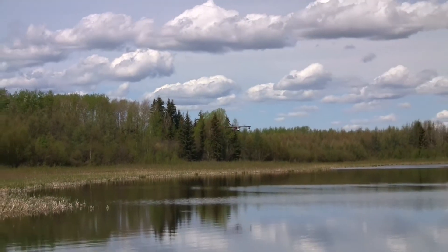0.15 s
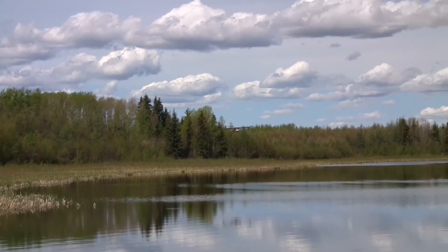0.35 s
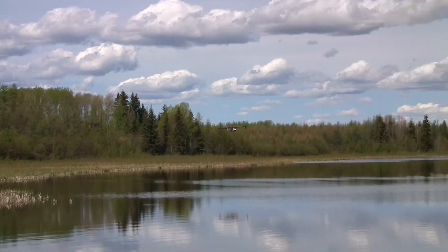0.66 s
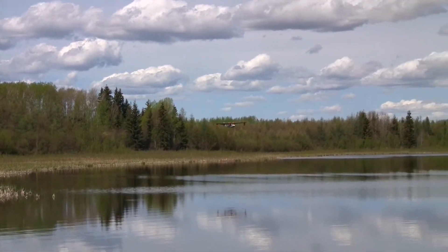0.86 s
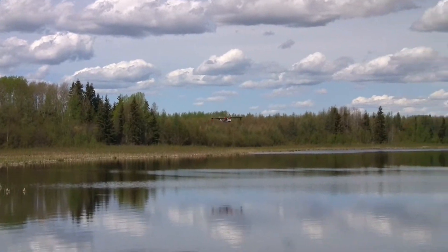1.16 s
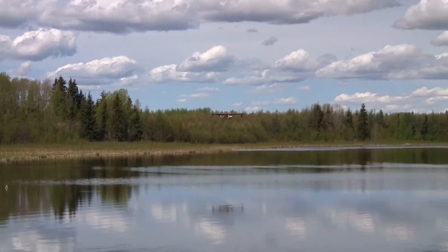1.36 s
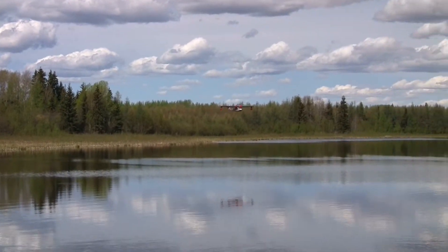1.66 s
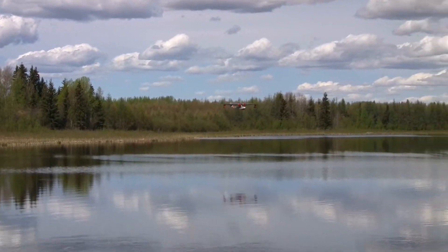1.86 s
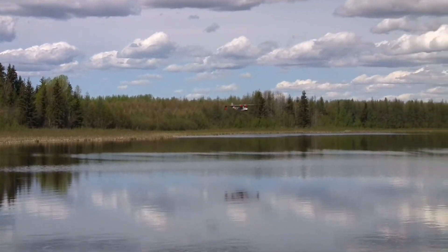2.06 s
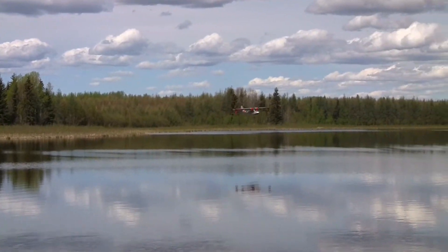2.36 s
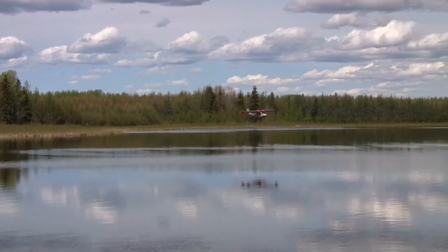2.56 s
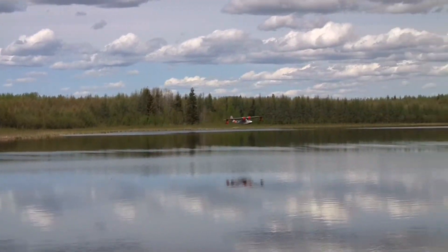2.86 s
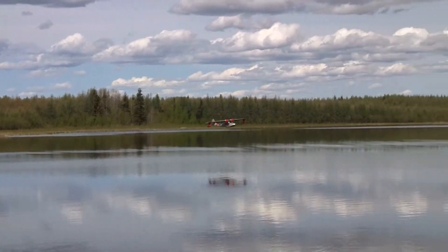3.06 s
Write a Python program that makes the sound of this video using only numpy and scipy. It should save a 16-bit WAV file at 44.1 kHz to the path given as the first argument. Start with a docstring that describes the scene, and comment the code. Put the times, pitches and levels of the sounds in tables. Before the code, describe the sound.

Raspy twin-engine buzz of a model plane starts distant and dull, then swells unevenly and sharpens as it nears over water; faint low air and light microphone hiss sit beneath, outdoors on open shore.

```python
"""From the start, two small two-stroke engines of a model aircraft approach over a calm lake: each shaft
turn thumps a pipe, cracks and puffs noise, mostly firing every other turn; the cracks ring until about 0.3 s.
The water's mirrored copy lags under 1 ms, so notches slide through the sound; shore air and hiss lie below.
At 1.04 s an airframe rattle ticks once. The engines slow overall and grow unevenly louder and brighter."""
import sys
import numpy as np
from scipy import signal
from scipy.fft import rfft, irfft, next_fast_len
from scipy.io import wavfile
from scipy.ndimage import uniform_filter1d, map_coordinates

SR = 44100
rng = np.random.default_rng(int(sys.argv[2]) if len(sys.argv) > 2 else 0)


def wrap_up_sound(samples):
    """Save the sound to the file named by the first command line argument, as 16-bit audio."""
    columns = np.atleast_2d(samples).T
    # keep every value between -1 and 1, then stretch to whole-number steps
    tamed = np.clip(columns, -1, 1)
    steps = np.round(tamed * 32767).astype(np.int16)
    wavfile.write(sys.argv[1], SR, steps)


N = 141561
TIME_S = np.arange(N) / SR


def undb(db):
    """Decibels to amplitude ratio."""
    return 10 ** (np.asarray(db) / 20)


def curve(table, axis):
    """A table column joined by straight lines in time."""
    rows = np.array(table, float)
    return np.interp(TIME_S, rows[:, 0], rows[:, axis])


def over_hz(table, size):
    """A (Hz, value) table interpolated over log frequency on the bins of a transform."""
    rows = np.array(table, float)
    bins_hz = np.fft.rfftfreq(size, 1 / SR)
    return np.interp(np.log(bins_hz + 1), np.log(rows[:, 0] + 1), rows[:, 1])


def colour(x, table, spread_ms=0, size=8192):
    """Minimum-phase filter with the table's gain, lows later than highs by up to spread_ms; rms 1 out."""
    cepstrum = irfft(over_hz(table, size) * np.log(10) / 20)
    cepstrum[1:size // 2] *= 2  # fold to causal
    cepstrum[size // 2 + 1:] = 0
    lag_s = spread_ms / 1000 * np.exp(-np.fft.rfftfreq(size, 1 / SR) / 400)
    sweep = np.exp(-2j * np.pi * np.cumsum(lag_s) * SR / size)
    response = irfft(np.exp(rfft(cepstrum)) * sweep)[:size // 2]
    y = signal.fftconvolve(x, response)[:N]
    return y / np.std(y)


def clicks(places, gains):
    """Impulses at fractional sample places, each shared between two samples."""
    out, whole = np.zeros(N + 2), np.clip(places, 0, N).astype(int)
    np.add.at(out, whole, gains * (1 - places % 1))
    np.add.at(out, whole + 1, gains * (places % 1))
    return out[:N]


# Shaft speed. Each row: time in seconds, first engine in turns per s, second engine in turns per s.
SHAFT_SPEED = [(0.0, 92.79, 93.25), (0.1, 92.34, 92.7), (0.2, 91.94, 92.42), (0.3, 93.6, 91.41),
               (0.4, 95.57, 89.6), (0.5, 95.94, 88.94), (0.6, 93.66, 89.21), (0.7, 94.11, 88.19),
               (0.8, 92.72, 88.18), (0.9, 91.2, 87.43), (1.0, 90.14, 87.02), (1.1, 90.85, 87.44),
               (1.2, 91.41, 85.94), (1.3, 88.95, 84.66), (1.4, 89.14, 82.67), (1.5, 88.56, 85.41),
               (1.6, 88.97, 84.24), (1.7, 88.19, 83.21), (1.8, 87.18, 80.43), (1.9, 87.2, 79.57),
               (2.0, 87.87, 81.5), (2.1, 88.05, 82.69), (2.2, 87.36, 83.53), (2.3, 86.33, 82.51),
               (2.4, 85.69, 80.91), (2.5, 86.83, 81.65), (2.6, 87.13, 83.55), (2.7, 86.29, 82.71),
               (2.8, 85.94, 81.3), (2.9, 83.97, 81.04), (3.0, 84.54, 80.46), (3.1, 85.53, 79.56),
               (3.21, 85.29, 79.91)]
# Swaps of the firing turn. Each row: one engine's swap times in seconds.
FIRING_SWAPS_S = [
    [.26, .7, .88, 1.27, 1.9, 2.4, 2.68, 2.84, 3.1],
    [1.0, 1.6, 1.78, 2.06, 2.35, 2.58, 2.78, 3.1],
]
# Pairs below: first engine, second engine.
START_TURNS, PIPE_LAG_MS, LOPE_LAG_MS = [.46, .61], [0.38, 2.072], 0.66
IDLE_CRACK_DB, EVERY_TURN_CRACKS_UNTIL_S = [-7, -5], [0, .26]
MISS_SHARE, JITTER_TURNS = .03, .003  # share of turns with firing and idle exchanged; crack timing sd
THUMP_SD_DB, CRACK_SD_DB = 1.2, 1.0
CRACK_DECAY_MS, SNAP_DB = .6, 17  # SNAP_DB: gain of the clean click added to the noise burst
PUFF_DECAY_TURNS, PUFF_FLOOR = 0.36, 1


def engine(e):
    """Thump, lope, crack and rush drives of engine e; idle turns invert the lope and weaken crack and puff."""
    turns = np.cumsum(curve(SHAFT_SPEED, axis=e + 1)) / SR + START_TURNS[e]
    k = np.arange(1, int(turns[-1]) + 1)
    timing, thump_chance, crack_chance = rng.standard_normal((len(k), 3)).T
    missed = rng.random(len(k)) < MISS_SHARE
    places = np.interp(k, turns, np.arange(N))
    swaps_so_far = np.searchsorted(FIRING_SWAPS_S[e], places / SR)
    idle = ((k + swaps_so_far) % 2 == 0) ^ missed

    piped = places + PIPE_LAG_MS[e] * SR / 1000
    push = undb(THUMP_SD_DB * thump_chance)
    thump = clicks(piped, push)
    lope = clicks(piped + LOPE_LAG_MS * SR / 1000, np.where(idle, -1, 1) * push)

    weakened = idle & (places >= EVERY_TURN_CRACKS_UNTIL_S[e] * SR)
    size = undb(IDLE_CRACK_DB[e] * weakened + CRACK_SD_DB * crack_chance)
    jitter = JITTER_TURNS * timing * np.gradient(places)  # samples
    snap = clicks(np.round(np.abs(places + jitter)), size)
    decay = np.exp(-np.arange(400) / (CRACK_DECAY_MS * SR / 1000))
    burst = signal.fftconvolve(snap, decay)[:N] * rng.standard_normal(N)
    crack = burst + undb(SNAP_DB) * snap

    puff = np.r_[0, size][turns.astype(int)] * np.exp(-(turns % 1) / PUFF_DECAY_TURNS)
    rush = (PUFF_FLOOR + puff) * rng.standard_normal(N)
    return np.array([thump, lope, crack, rush])


# Exhaust pipes. Each row: frequency in Hz, first engine gain in dB, second engine gain in dB.
PIPE_GAINS = [(35, -55, -56.5), (60.6, -55, -58.5), (100, -36, -21.5), (160.5, -15.5, -20),
              (233.5, -15, -7), (346.3, -2.5, -11), (365.4, -7, -18.5), (428.2, 3, 5), (500, -6, -3),
              (580, -21, -23), (681, -12.5, -12.5), (1020, -19, -21.5), (1190, -21.5, -18),
              (1564, -63.5, -58.5), (2670, -120, -120)]
# Lope: the alternating part of the thump, added on firing turns and inverted on idle turns.
# Each row: frequency in Hz, gain in dB.
LOPE_GAINS = [(35, -85.5), (60, -78), (103, -29.5), (238, -7.5), (338, -3), (374, -4.5), (424, 1.5),
              (595, -25.5), (666, -13), (970, -39), (1200, -24), (1560, -35.5), (2640, -120)]
PIPE_DB, PIPE_SPREAD_MS = [-4, -2], 2.81  # PIPE_DB: first, second engine
LOPE_DB, SECOND_LOPE_DB = -5, -5


def exhaust_thump(first, second):
    """Pipes resonate to every turn and delay lows; the lope sets firing and idle turns apart."""
    pipe = 0
    for e, drive in enumerate((first, second)):
        gains = np.array(PIPE_GAINS)[:, [0, e + 1]]
        pipe = pipe + undb(PIPE_DB[e]) * colour(drive[0], gains, spread_ms=PIPE_SPREAD_MS)
    lope_drive = first[1] + undb(SECOND_LOPE_DB) * second[1]
    return pipe + undb(LOPE_DB) * colour(lope_drive, LOPE_GAINS, spread_ms=PIPE_SPREAD_MS)


WHINE_HZ, WHINE_WIDTH_HZ, WHINE_DB, WHINE_HALF_S, WHINE_FADE_S = 2600, 130, 13, .33, .06


def early_whine(crack):
    """A narrow resonance rings to the cracks, then fades on a logistic curve."""
    ring = signal.lfilter(*signal.iirpeak(WHINE_HZ, WHINE_HZ / WHINE_WIDTH_HZ, fs=SR), crack)
    return undb(WHINE_DB) * ring / (1 + np.exp((TIME_S - WHINE_HALF_S) / WHINE_FADE_S))


# Port opening. Each row: frequency in Hz, gain in dB.
CRACK_GAINS = [(290, -31), (500, 1.5), (600, -5.5), (680, -0.5), (950, -4), (1270, -18), (1560, -18.5),
               (1850, -9), (2300, -7), (2650, -20.5), (3000, -17.5), (3400, -14.5), (4300, -41.5),
               (5150, -32.5), (5900, -18.5), (6400, -40.5), (8800, -38), (11000, -45.5), (14300, -58)]
# Propellers and escaping gas. Each row: frequency in Hz, gain in dB.
RUSH_GAINS = [(470, -29), (800, 7), (1000, -3.5), (1300, -2.5), (1590, -10), (1930, -3), (2600, -3.5),
              (3000, -12), (3400, -11), (4400, -16.5), (5200, -31), (5900, -11.5), (6500, -20),
              (8700, -24.5), (11800, -49), (12800, -75), (16600, -105)]
CRACK_DB, RUSH_DB, SECOND_ENGINE_DB, TREBLE_HZ = -2.5, -3.5, 3, 5000


def crack_and_rush(first, second, treble_db):
    """Port cracks and turn-pulsed noise of both engines, with treble gain moving in time."""
    crack_drive, rush_drive = first[2:] + undb(SECOND_ENGINE_DB) * second[2:]
    crack = undb(CRACK_DB) * colour(crack_drive, CRACK_GAINS)
    bright = crack + undb(RUSH_DB) * colour(rush_drive, RUSH_GAINS)
    high_pass = signal.butter(2, TREBLE_HZ, "high", fs=SR, output="sos")
    treble = signal.sosfiltfilt(high_pass, bright)
    return bright + (undb(treble_db) - 1) * treble + early_whine(crack)


# Approach. Each row: time in seconds, thump gain in dB, crack and rush gain in dB, extra treble gain in dB.
APPROACH_GAINS = [(0.0, -36.5, -40.5, -34), (0.23, -37, -38, -3.5), (0.44, -33.5, -38.5, -26),
                  (0.9, -34, -39.5, -4.5), (1.51, -32, -35.5, -6.5), (1.94, -32, -35, 2.5),
                  (2.28, -30.5, -34, -1), (2.89, -30, -35, 5), (2.92, -27.5, -35.5, 3),
                  (3.12, -29.5, -36.5, 4.5), (3.15, -26.5, -34, 2.5), (3.2, -30.5, -36, 0.5)]


def aircraft():
    """Both engines, rising unevenly as they come near, plus the airframe tick."""
    first, second = engine(0), engine(1)
    thump = undb(curve(APPROACH_GAINS, axis=1)) * exhaust_thump(first, second)
    bright = crack_and_rush(first, second, treble_db=curve(APPROACH_GAINS, axis=3))
    return thump + undb(curve(APPROACH_GAINS, axis=2)) * bright + tick()


# Water path. Each row: time in seconds, lag of the mirrored sound in ms.
MIRROR_LAG = [(0, 0.74), (.3, 0.694), (.6, 0.61), (.9, 0.52), (1.6, 0.51), (2.0, 0.54), (2.3, 0.524),
              (2.5, 0.52), (2.8, 0.45), (3.21, 0.35)]
MIRROR_DB, MIRROR_LOW_PASS_HZ = -2.5, 6000


def over_water(plane):
    """Direct sound plus a duller mirrored copy whose moving lag slides the comb notches."""
    lagged_places = np.arange(N) - curve(MIRROR_LAG, axis=1) * SR / 1000
    late = map_coordinates(plane, [lagged_places], mode="mirror")
    low_pass = signal.butter(1, MIRROR_LOW_PASS_HZ, fs=SR, output="sos")
    return plane + undb(MIRROR_DB) * signal.sosfilt(low_pass, late)


EDDY_MS, EDDY_RMS_RADIANS = 20, 3


def eddies(x):
    """Moving air scatters the sound: its phase wanders as smoothed noise."""
    k = int(EDDY_MS * SR / 1000)
    wander = uniform_filter1d(uniform_filter1d(rng.standard_normal(N), k), k)
    phase = EDDY_RMS_RADIANS * wander / np.std(wander)
    return np.real(signal.hilbert(x, next_fast_len(N))[:N] * np.exp(1j * phase))


# Microphone balance. Each row: frequency in Hz, left minus right in dB.
BALANCE = [(60, -1.0), (110, 0.0), (200, 0.5), (350, 2.0), (640, 1.5), (1160, 1.5), (2090, 2.0),
           (3770, 0.0), (6820, 4.0), (12300, -3.5)]
# Microphone phase. Each row: frequency in Hz, left lead in radians.
LEFT_LEAD = [(0, 0), (1890, 0.3), (2500, -0.6), (2930, 0.3), (3700, -0.1), (3960, 0.9), (4390, -0.2),
             (4740, 0.3), (5250, 3.2), (7580, 5.4), (9040, 5.3), (10300, 6.5), (11500, 6.4), (12500, 3.8)]
# Sound scattered separately to each port. Each row: frequency in Hz, gain in dB.
SCATTER_GAINS = [(60, -8), (250, -24), (600, -17), (1200, -13), (2700, -12), (5000, -5), (8000, -7),
                 (12000, -2)]


def microphone_pair(plane, heard):
    """Left and right split level and phase evenly; each adds its own scattered sound."""
    def spectrum(x):
        return rfft(np.r_[x, x[::-1]])  # mirrored to avoid an edge

    left = undb(over_hz(BALANCE, 2 * N) / 2) * np.exp(1j * over_hz(LEFT_LEAD, 2 * N) / 2)
    scatter_gain = undb(over_hz(SCATTER_GAINS, 2 * N))
    ports = []
    for response in (left, 1 / left):
        scattered = spectrum(eddies(plane)) * scatter_gain
        ports.append(irfft(spectrum(heard) * response + scattered)[:N])
    return np.array(ports)


# Shore air. Each row: frequency in Hz, gain in dB.
AIR_GAINS = [(12, -74.5), (20, -52), (37, -42.5), (107, -6.5), (268, 5), (400, -14), (520, -40),
             (880, -120)]
AIR_DB, AIR_SIDE_GAIN = -46.5, 0.2


def shore_air():
    """Low noise, mostly common to both sides."""
    both, left, right = (colour(rng.standard_normal(N), AIR_GAINS) for _ in range(3))
    return undb(AIR_DB) * (both + AIR_SIDE_GAIN * np.array([left, right]))


# Microphone hiss. Each row: frequency in Hz, gain in dB.
HISS_GAINS = [(1000, -14), (4000, 12), (9000, 2.5), (13000, -19)]
HISS_DB = -57.5


def microphone_hiss():
    """Independent coloured noise in each microphone."""
    return undb(HISS_DB) * np.array([colour(rng.standard_normal(N), HISS_GAINS) for _ in range(2)])


# Airframe rattle modes. Each row: frequency in Hz, gain in dB.
RATTLE_MODES = [(3350, 6), (4200, -3), (5900, 7)]
TICK_S, TICK_DB, TICK_DECAY_S = 1.04, -42, 0.0059


def tick():
    """One rattle: decaying sine modes of the airframe."""
    s = np.maximum(TIME_S - TICK_S, 0)
    modes = sum(undb(db) * np.sin(2 * np.pi * hz * s) for hz, db in RATTLE_MODES)
    return undb(TICK_DB) * np.exp(-s / TICK_DECAY_S) * modes


def scene():
    """Aircraft over water at the microphone pair, with shore air and hiss."""
    plane = aircraft()
    return microphone_pair(plane, over_water(plane)) + shore_air() + microphone_hiss()


LOW_CUT_HZ, TOP_HZ = 63, 12925


def record(dry):
    """First-order bass cut, then a steep elliptic top cut."""
    thin = signal.sosfilt(signal.butter(1, LOW_CUT_HZ, "high", fs=SR, output="sos"), dry)
    return signal.sosfilt(signal.ellip(8, .2, 70, TOP_HZ, fs=SR, output="sos"), thin)


dry = scene()
out = record(dry)
wrap_up_sound(out)
```